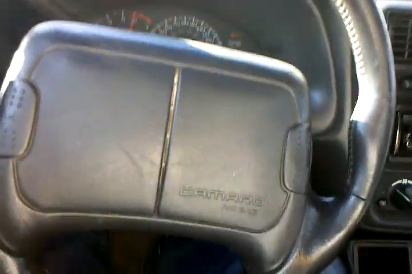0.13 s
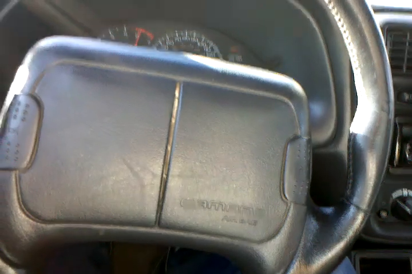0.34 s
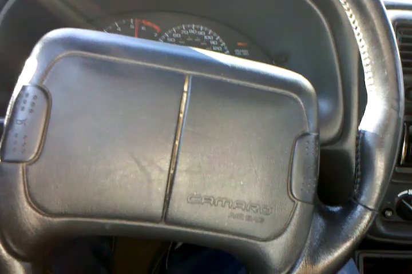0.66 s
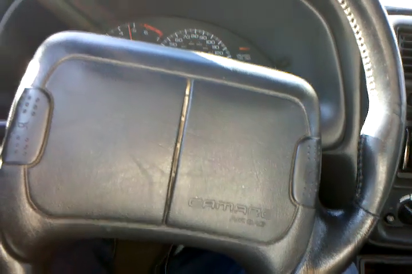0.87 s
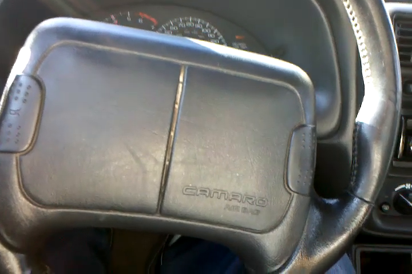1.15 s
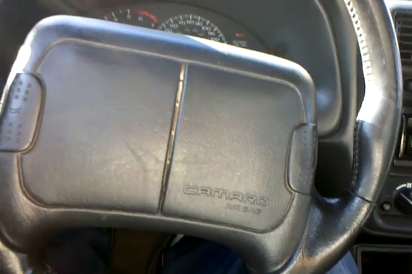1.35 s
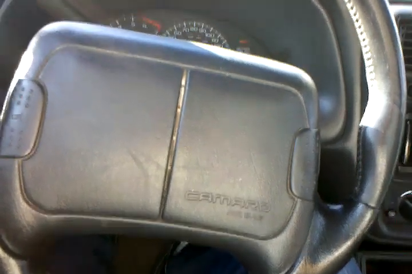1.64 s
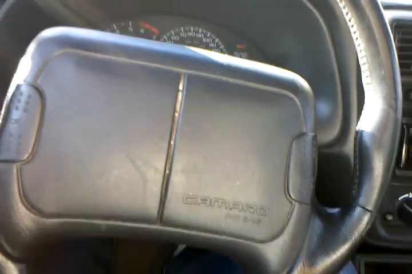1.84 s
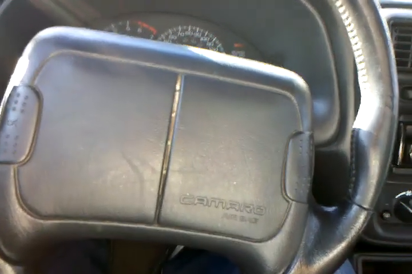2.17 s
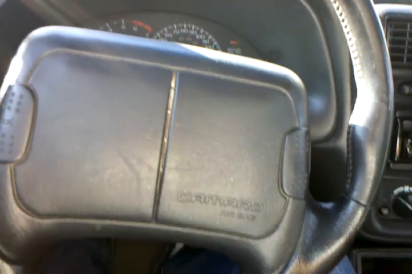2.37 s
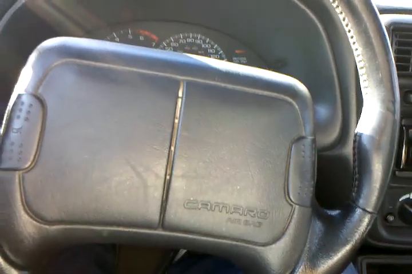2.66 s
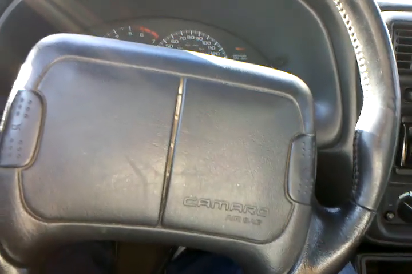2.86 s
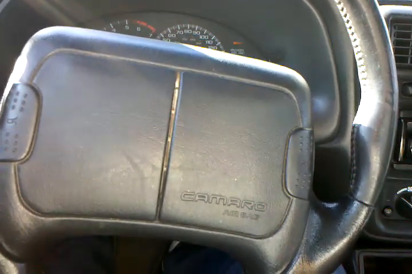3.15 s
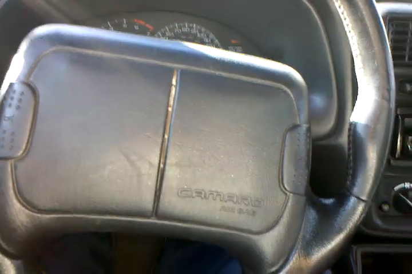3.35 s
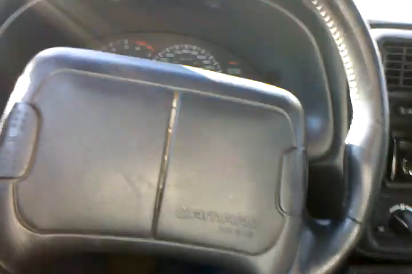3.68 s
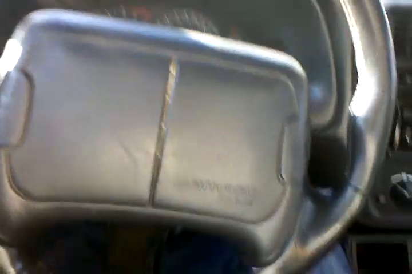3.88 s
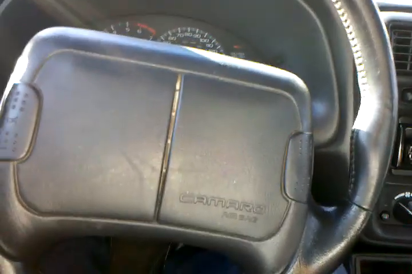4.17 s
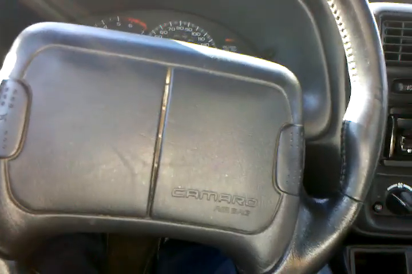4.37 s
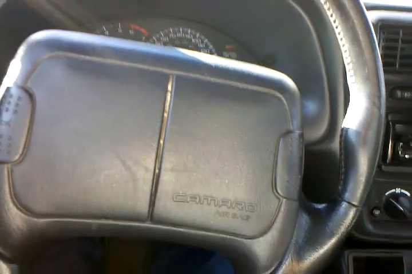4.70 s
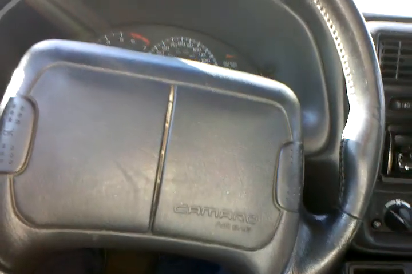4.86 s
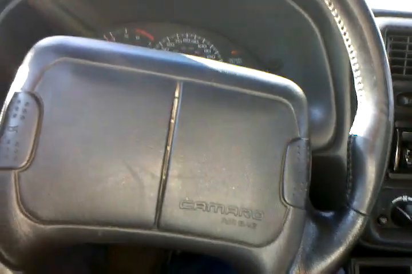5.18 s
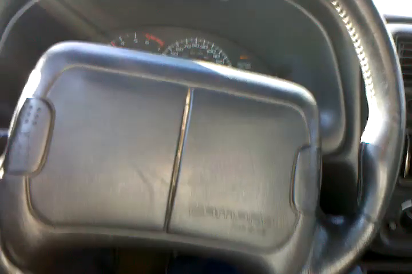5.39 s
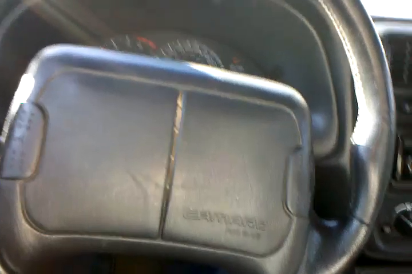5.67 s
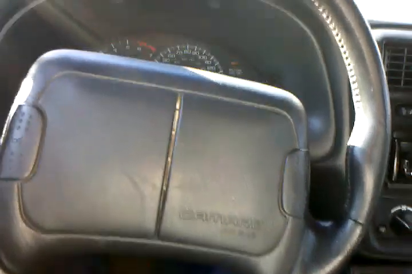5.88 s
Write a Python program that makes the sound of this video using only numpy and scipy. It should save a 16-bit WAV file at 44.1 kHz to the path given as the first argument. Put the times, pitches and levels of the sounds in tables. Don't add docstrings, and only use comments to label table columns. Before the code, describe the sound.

Inside a car cabin, a large V8 with an uneven, misfiring beat is already rising at the start. It swells to a loud, droning roar by about 0.45 seconds, with coarse intake rush, valve-gear hiss, buzzing trim and faint overload ticks on a small close microphone. From 0.6 it glides down in pitch and loudness, with a sharp exhaust pop at 1.8. It sinks into a lumpy, low idle, with soft, boomy puffs near 2.8 to 3.0 and fainter ones around 3.5. At 3.8 a deep throttle stab crackles and thumps; the engine surges to a shorter peak at 4.1, barks as the throttle snaps shut, then falls to a strong pop at 4.6. A gentler stab at 5.0 thumps and rises until 5.3, then drops away, with a final booming pop near 5.8 before the sound ends, still coasting down.

```python
import sys
import numpy as np
from scipy import signal
from scipy.io import wavfile
from scipy.ndimage import uniform_filter1d

SR = 44100
rng = np.random.default_rng(int(sys.argv[2]) if len(sys.argv) > 2 else 0)


def waveform_to_disk(signal):
    frames = np.transpose(np.atleast_2d(signal))
    scaled = np.clip(frames, -1, 1) * 32767
    samples = np.round(scaled).astype(np.int16)
    wavfile.write(sys.argv[1], SR, samples)


def voltage_ratio(decibels):
    exponent = np.asarray(decibels, float) / 20
    return 10 ** exponent


N = 266011
T = np.arange(N) / SR
FLYWHEEL_S = 0.05

# down_s, up_s, depth_db, release_s
PEDAL = [
    (-.3, 0.4, -0.47, 0.1),
    (3.767, 4.126, -0.6, 0.0066),
    (4.963, 5.262, -5.5, 0.01),
]
# pitch_hz, level_db (per Hz)
HISS = [(590, -38.5), (1000, -2.5), (1370, -7.5), (1820, -8.5), (2370, -13.5), (3590, -8), (5850, -10.5),
        (6930, -11.5), (7680, -40), (8000, -44.5), (9150, -53.5), (9400, -110)]
# pitch_hz, width_hz, level_db (above the noise)
TRIM = [(511.2, 43, 11), (662, 20, 7.5), (922, 140, 6), (1089, 12, 8), (1836, 95, 8), (2960, 17, 10),
        (3332, 17, 12.5), (3672, 61, 9.5), (3732, 13, 0), (4367, 34, 8), (4830, 57, 6), (5450, 37, 6.5),
        (5900, 73, 7), (7150, 25, 8)]


def evened(x):
    return x / np.sqrt(np.mean(x ** 2) + 1e-20)


def read(points, hz):
    f, db = np.transpose(points)
    return np.interp(np.log(hz + 1), np.log(f + 1), db, left=-70, right=-125)


def colour(x, points, rings=()):
    hz = np.fft.rfftfreq(16384, 1 / SR)
    db = read(points, hz)
    for at_hz, width_hz, ring_db in rings:
        db = db + ring_db / (1 + (2 * (hz - at_hz) / width_hz) ** 2)
    log_gain = np.log(voltage_ratio(np.r_[db, db[-2:0:-1]]))
    response = np.fft.ifft(np.exp(np.conj(signal.hilbert(log_gain)))).real
    taps = response[:6000] * np.hanning(12000)[6000:]
    return signal.oaconvolve(x, taps)[:len(x)]


def wander(size):
    steps = rng.standard_normal(N // size * 4 + 8)
    smooth = evened(np.convolve(steps, np.hanning(9), "same"))
    return np.interp(np.arange(N) * 4 / size, np.arange(len(steps)), smooth)


def summed(*levels_db):
    return 10 * np.log10(sum(voltage_ratio(db) ** 2 for db in levels_db) + 1e-14)


def law(cycle_hz, middle_db, db_per_doubling):
    return middle_db + db_per_doubling * np.log2(cycle_hz / 30)


def crank():
    # time_s, speed_hz (engine cycles per s)
    speed = [(0, 22.5), (.21, 39.6), (.34, 50), (.44, 56), (.6, 51.1), (1.33, 31.4), (1.81, 22),
             (2.3, 16.2), (2.9, 12.8), (3.75, 11.3), (4.05, 26.4), (4.14, 31), (4.65, 21.1), (4.95, 18.9),
             (5.09, 23.1), (5.3, 30.9), (5.77, 23), (6.03, 20.2)]
    s, hz = np.transpose(speed)
    glide = np.interp(T, s, np.log(hz))
    return np.exp(uniform_filter1d(glide, round(FLYWHEEL_S * SR), mode="nearest"))


def pedal():
    press_s, tip_in = 0.21, 0.22
    hush_depth_db, hush_s = -2.5, 0.073
    opening, hush_db = np.zeros((2, N))
    for down, up, depth_db, release in PEDAL:
        stroke = tip_in + (1 - tip_in) * np.clip((T - down) / press_s, 0, 1) ** 2
        closing = np.exp(-np.maximum(T - up, 0) / release)
        opening += voltage_ratio(depth_db) * (T > down) * stroke * closing
        hush_db += hush_depth_db * np.exp(-((T - up - release) / hush_s - .5) ** 2 * 2)
    return opening, hush_db


def fuelled():
    fuel_back = [
        1.84,
        4.611,
        5.768,
    ]
    since = np.min([np.where(T >= s, T - s, np.inf) for s in fuel_back], axis=0)
    lifted = np.min([np.where(T >= up, T - up, np.inf) for _, up, *_ in PEDAL], axis=0)
    relit = uniform_filter1d(1. * (since < lifted), round(FLYWHEEL_S * SR))
    return np.minimum(since, 9), relit


def hollows(hz):
    # pitch_hz, width_hz, level_db
    hollow_rings = [(55, 19, -5), (88, 16, -6.5), (115.5, 23, -0.5), (138, 19, 0), (158.4, 22, 8),
                    (197.2, 28.7, 3.5), (289, 43, -7), (360, 74, -4.5)]
    gains_db = []
    for at_hz, width_hz, db in hollow_rings:
        gains_db.append(db - 20 * np.log10(1 + (2 * (hz - at_hz) / width_hz) ** 2))
    return summed(*gains_db)


def orders(cycle_hz, opening, hush_db, relit):
    # pitch_hz, level_db
    loaded_beat = [(40, -28), (75, -19), (112, -0.5), (180, 6), (230, -5.5), (262, -8.5), (300, -26),
                   (460, -13.5)]
    # pitch_hz, level_db
    loaded_firing = [(60, -28), (120, -3.5), (165, 5), (190, 3), (215, -11), (245, -17), (300, -17.5),
                     (460, -17)]
    free_levels = [-3.5, 1.5, 0.06]
    loaded_levels = [-13.5, 0.2, 2.8]
    relit_levels = [-1.5, -2.5, 2]
    hush_shares = [.2, 1, 1.5]
    load_bends = [0.81, 0.7, .25]
    spectra = (loaded_beat, loaded_beat, loaded_firing)
    rows = zip((3, 5, 8), spectra, free_levels, loaded_levels, relit_levels, hush_shares, load_bends)
    out = []
    for k, spectrum, db, on_db, relit_db, share, bend in rows:
        load = np.clip(opening, 0, 1) ** bend
        free_db = db + hollows(k * cycle_hz) + relit * relit_db
        loaded_db = on_db + read(spectrum, k * cycle_hz)
        out.append((1 - load) * free_db + load * loaded_db + share * hush_db)
    return out


def tone(turns, db, sway_db):
    start = rng.random()
    strength = np.sqrt(2) * voltage_ratio(db + sway_db * wander(size=1500))
    phase_sway = .1 * sway_db * wander(size=1500)
    return strength * np.cos(2 * np.pi * (turns + start) + phase_sway)


def drone(turns, levels_db):
    return sum(tone(k * turns, db, sway_db=.7) for k, db in zip((3, 5, 8), levels_db))


def misfire(turns, cycle_hz, level_db):
    # pitch_hz, level_db
    cabin = [(45, -28.5), (60, -27), (85, -21.5), (112, -15), (160, 1.5), (200, -8), (250, -16.5),
             (320, -12), (400, -21), (510, -15), (580, -21.5), (660, -14.5), (790, -26.5), (1000, -17.5)]
    minor_levels = [-8, -0.5, -5.5, 2, -5, -2, -3.5, 0.8, -2.2, -1, -2, -5, -3, -2.6, -2, -5.5, -4.5, -7,
                    -7]
    minor_orders = [k for k in range(1, 23) if k not in (3, 5, 8)]
    dent = np.zeros(N)
    for k, db in zip(minor_orders, minor_levels):
        dent += tone(k * turns, level_db + db + read(cabin, k * cycle_hz), sway_db=2.2)
    return dent


def ragged(cycle_hz, opening, since, relit):
    coasting_db = law(cycle_hz, -33, 3.9)
    pushed_db = law(cycle_hz, -26.5, -1) + 10 * np.log10(opening + 1e-9)
    fade_db = 4 * since
    relit_db = law(cycle_hz, -30, 0.1) - fade_db + 20 * np.log10(abs(relit) + 1e-9)
    return summed(coasting_db, pushed_db, relit_db)


def thump(turns, cycle_hz, ragged_db):
    # pitch_hz, level_db
    cabin_boom = [(15, -93.5), (25, -61.5), (81, -21), (104, -10.5), (157, -2), (208, -8), (229, -18),
                  (279, -28), (316, -18), (354, -24.5), (501, -28), (592, -31), (700, -44), (910, -55.5),
                  (1540, -120)]
    fires = np.diff(np.floor(8 * turns), prepend=0) > 0
    excess = rng.choice([-1, 1], N) * rng.uniform(.5, 1.3, N)
    uneven = fires * excess / np.sqrt(cycle_hz)
    return voltage_ratio(ragged_db) * evened(colour(uneven, cabin_boom))


def rattling(noise, points):
    plain = colour(noise, points)
    ringing = colour(noise, points, TRIM) - plain
    return evened(plain + voltage_ratio(3.5 * wander(size=500)) * ringing)


def air(turns, roar_db, hiss_db):
    # pitch_hz, level_db (per Hz)
    roar_colour = [(150, -44), (250, -4), (330, -8.5), (400, -11), (500, -8), (575, -7), (740, -15.5),
                   (1050, -18.5), (1500, -24.5), (1900, -25), (2500, -25), (3300, -34.5), (5000, -110)]
    firing = np.sin(np.pi * (8 * turns % 1) ** .6) ** 2
    strength = voltage_ratio(2.5 * rng.standard_normal(N // 50))[np.floor(8 * turns).astype(int)]
    puffs = firing * strength
    gusts = voltage_ratio(0.23 * wander(size=1200))
    roar = rattling(rng.standard_normal(N) * (1 + .4 * puffs) * gusts, roar_colour)
    hiss = rattling(rng.standard_normal(N) * (1 + .45 * puffs) * gusts, HISS)
    return voltage_ratio(roar_db - 0.5) * roar + voltage_ratio(hiss_db) * hiss


def tailpipe():
    # pitch_hz, width_hz, level_db
    pipe_rings = [(225, 58, 3), (288, 60, 6), (496, 70, -1.5), (659, 49, -2.5), (1010, 180, -4.5),
                  (1810, 250, -8)]
    t = T[:2000]
    ring = np.zeros(len(t))
    for hz, width_hz, db in pipe_rings:
        decay = np.exp(-np.pi * width_hz * t)
        ring += voltage_ratio(db) * np.sqrt(width_hz) * decay * np.sin(2 * np.pi * hz * t)
    ring = signal.lfilter(*signal.butter(3, 170, "high", fs=SR), ring)
    return ring / np.linalg.norm(ring)


def pops():
    # start_s, crack_db, bark_db, boom_db, length_s
    bursts = [(1.836, -21.5, -15.5, -35, 0.025), (2.785, -48, -35, -19, 0.018),
              (2.955, -55, -43, -20.5, 0.011), (3.516, -53, -36, -29, 0.0074), (3.646, -54, -35, -29, 0.01),
              (3.767, -34, -31, -43, 0.027), (3.832, -25.5, -36, -40, 0.0072),
              (3.885, -25, -33.5, -10, .03), (3.932, -22, -21, -26, 0.015), (4.126, -23, -12, -9, 0.01),
              (4.606, -13.5, -14, -9.5, 0.03), (4.991, -44, -26, -7, 0.03),
              (5.768, -17, -18.5, -4.5, 0.021)]
    crack, bark, boom = np.zeros((3, N))
    for start, crack_db, bark_db, boom_db, length in bursts:
        age = np.maximum(T - start, 0)
        rise = 1 - np.exp(-age / 0.0047)
        burst = rise * (np.exp(-(age / length) ** 4) + 0.99 * np.exp(-age / 0.025))
        crack += voltage_ratio(crack_db) * burst
        bark += voltage_ratio(bark_db) * burst
        late = np.maximum(age - .012, 0)
        swings = (1 - np.exp(-late / .004)) * np.exp(-(late / .034) ** 3)
        boom += voltage_ratio(boom_db - 4.5) * swings * np.sin(2 * np.pi * 156 * late)
    noise = rng.standard_normal((2, N))
    cracks = crack * evened(colour(noise[0], HISS, TRIM))
    barks = signal.oaconvolve(bark * noise[1], tailpipe())[:N]
    return voltage_ratio(-11.5) * cracks + voltage_ratio(-6.5) * barks + boom


def scene():
    cycle_hz = crank()
    opening, hush_db = pedal()
    since, relit = fuelled()
    turns = np.cumsum(cycle_hz) / SR
    open_db = 20 * np.log10(opening + 1e-9)
    idle = 1 / (1 + np.exp(np.clip((cycle_hz - 14.03) / .3, -50, 50)))
    quiet_db = hush_db - idle

    exhaust_db = law(cycle_hz, -23.5, 11.7) + 1 * opening - 9.5 * idle
    levels_db = [exhaust_db + db for db in orders(cycle_hz, opening, hush_db, relit)]
    exhaust = drone(turns, levels_db) + misfire(turns, cycle_hz, exhaust_db)
    exhaust += thump(turns, cycle_hz, ragged(cycle_hz, opening, since, relit))

    rumble_db = law(np.minimum(cycle_hz, 31.9), -25, 16.8) + quiet_db
    roar_db = summed(rumble_db, law(cycle_hz, -24.5, 1.2) + open_db)
    valves_db = law(cycle_hz, -33, 16.43) + quiet_db
    hiss_db = summed(valves_db, law(cycle_hz, -24.5, 8.9) + open_db)
    return (exhaust + air(turns, roar_db, hiss_db) + pops())[None]


def low_pass(x):
    return signal.sosfilt(signal.butter(12, 15900, fs=SR, output="sos"), x)


def record(dry):
    # time_s, level_db
    overloads = [(0.335, -52.5), (0.4024, -74.5), (0.41, -51), (0.4408, -36), (0.4423, -43.5), (0.495, -45),
                 (0.545, -46.5), (0.5464, -41), (0.8618, -44)]
    thin = signal.lfilter(*signal.butter(2, 38, "high", fs=SR), dry)
    rounded = thin / (1 + (thin / .8) ** 6) ** (1 / 6)
    lowpass = signal.firwin(401, 9250, window=("kaiser", 9), fs=SR)
    rounded = signal.oaconvolve(rounded, lowpass[None], "same")
    s, tick_db = np.transpose(overloads)
    ticks = np.zeros(N)
    ticks[np.round((s + .001) * SR).astype(int)] = -voltage_ratio(tick_db + 13)
    return low_pass(rounded + ticks)


dry = scene()
out = record(dry)
waveform_to_disk(out)
```